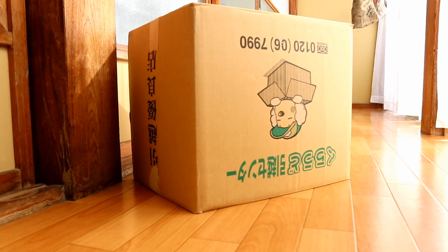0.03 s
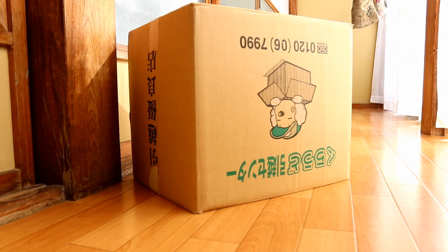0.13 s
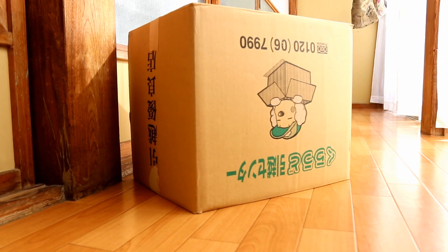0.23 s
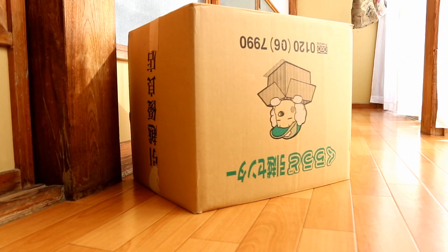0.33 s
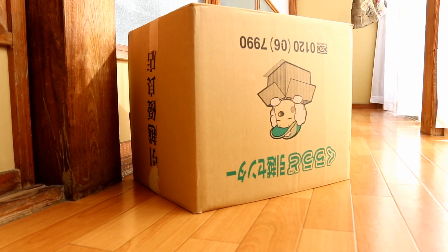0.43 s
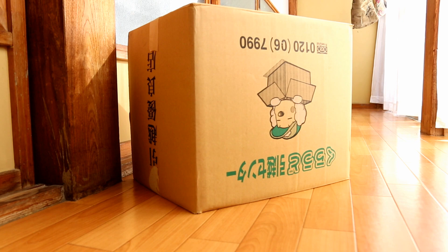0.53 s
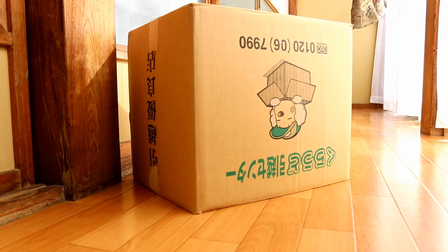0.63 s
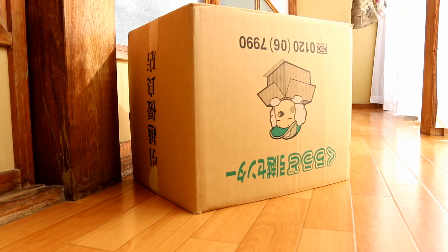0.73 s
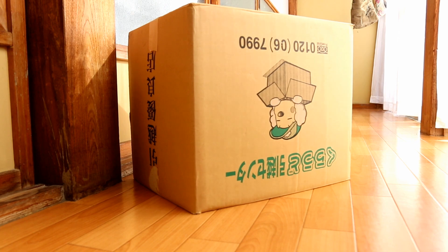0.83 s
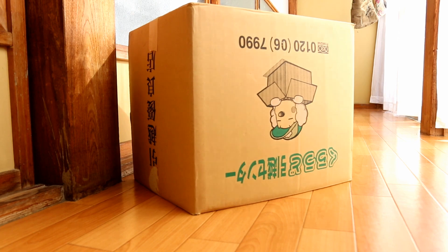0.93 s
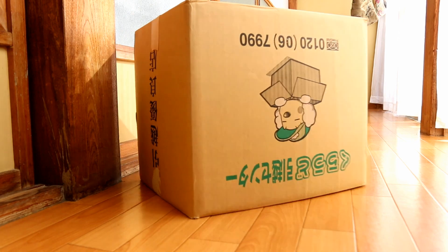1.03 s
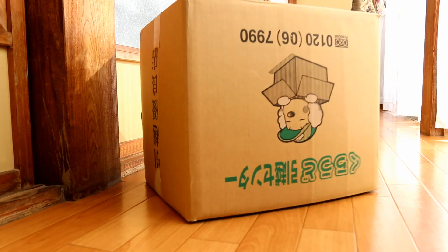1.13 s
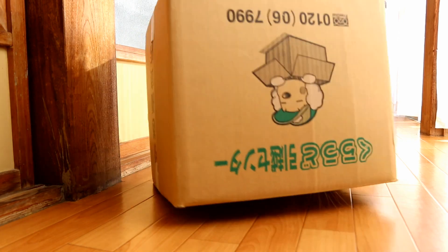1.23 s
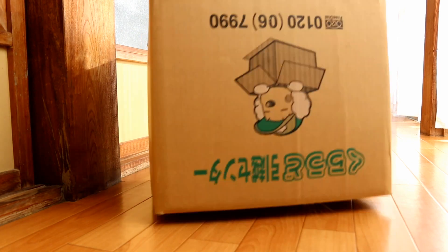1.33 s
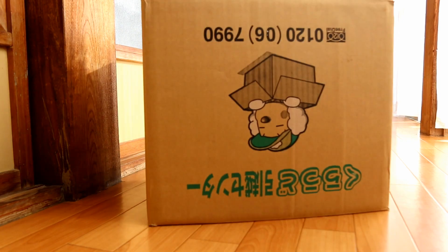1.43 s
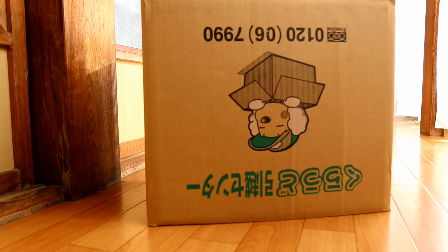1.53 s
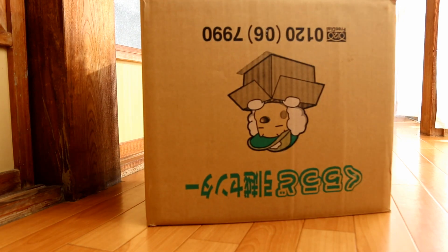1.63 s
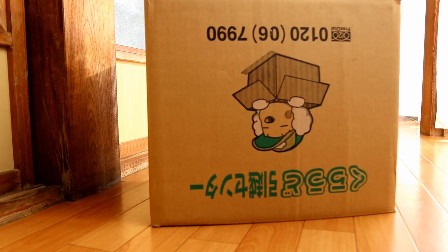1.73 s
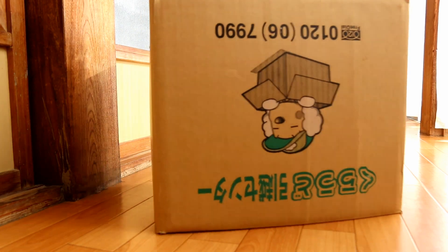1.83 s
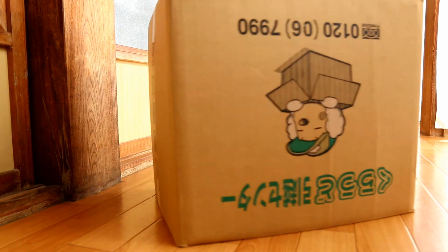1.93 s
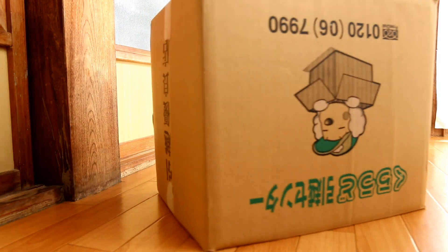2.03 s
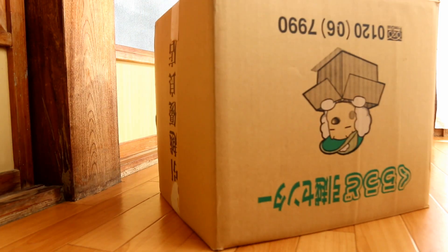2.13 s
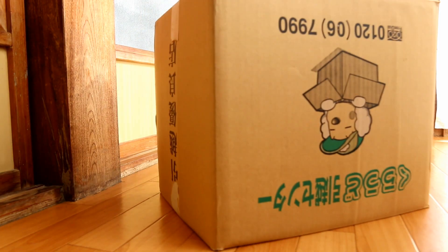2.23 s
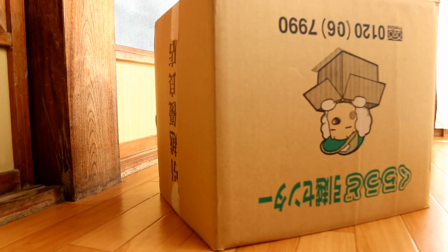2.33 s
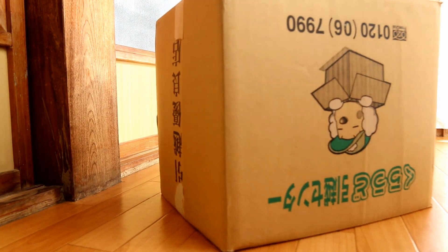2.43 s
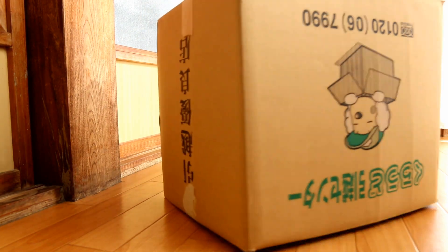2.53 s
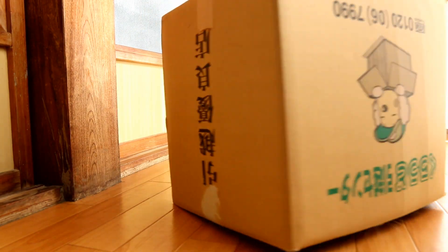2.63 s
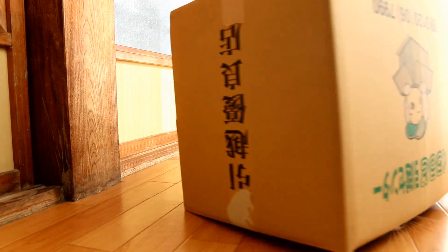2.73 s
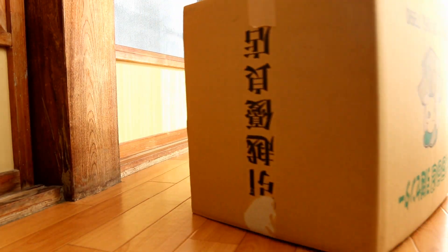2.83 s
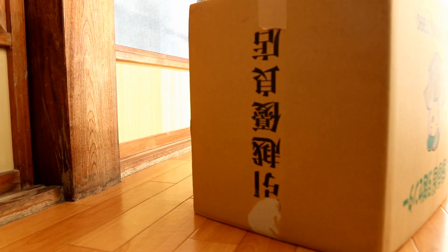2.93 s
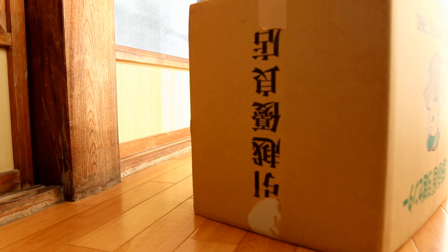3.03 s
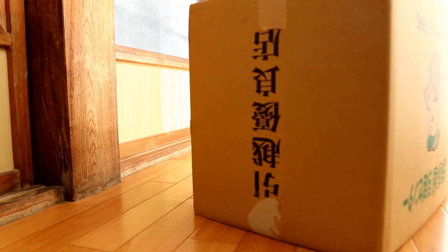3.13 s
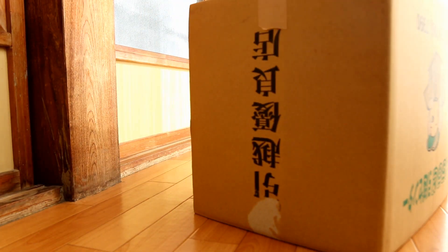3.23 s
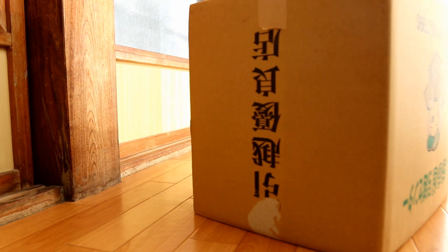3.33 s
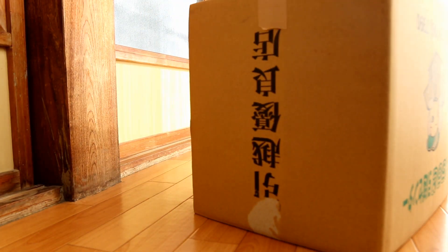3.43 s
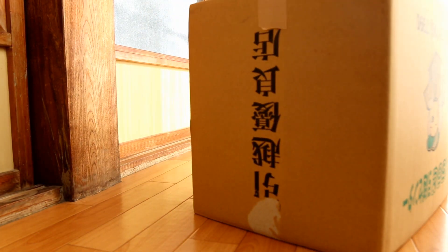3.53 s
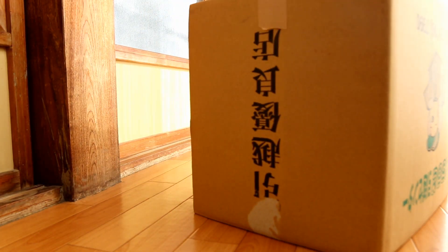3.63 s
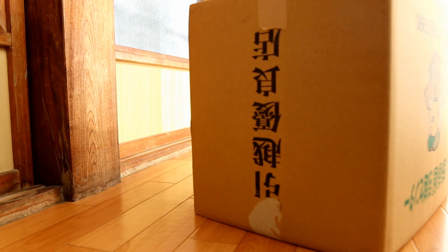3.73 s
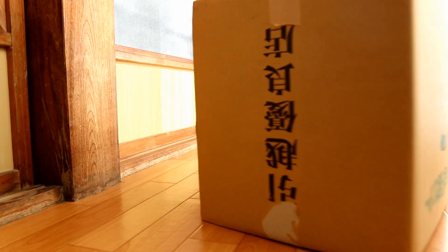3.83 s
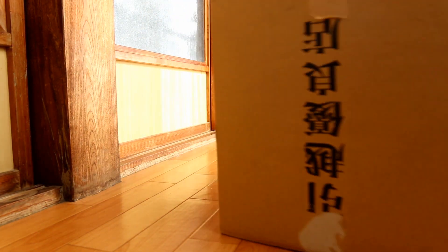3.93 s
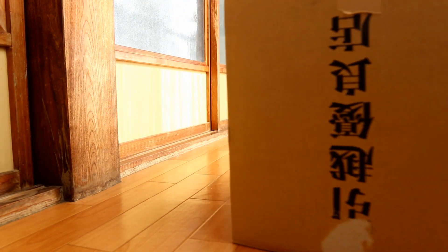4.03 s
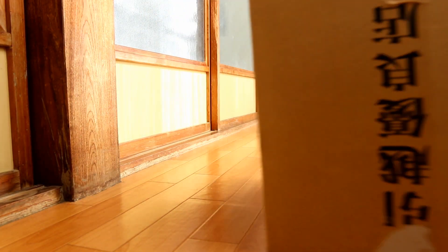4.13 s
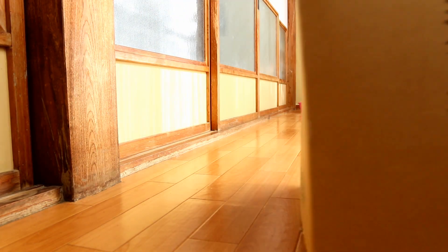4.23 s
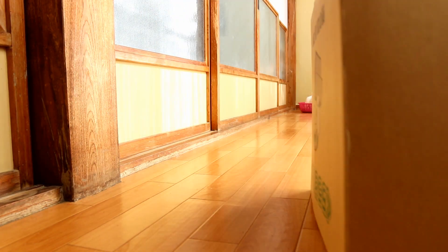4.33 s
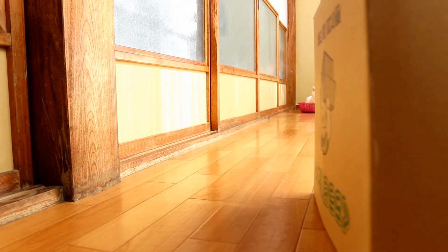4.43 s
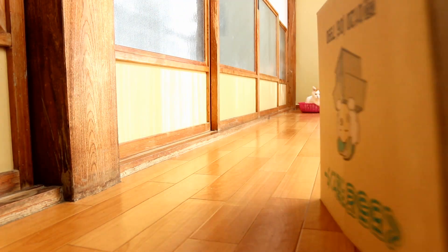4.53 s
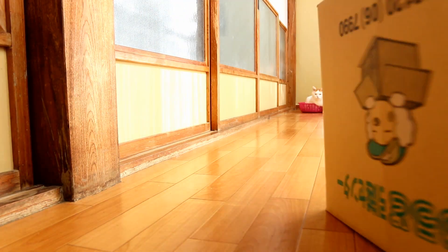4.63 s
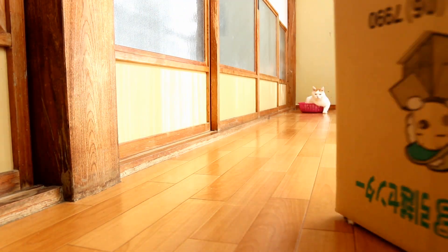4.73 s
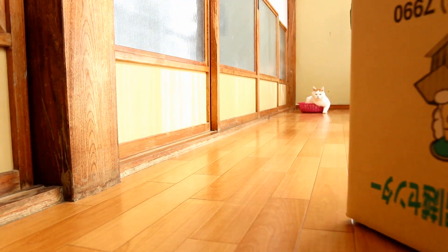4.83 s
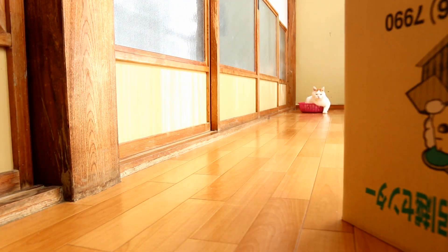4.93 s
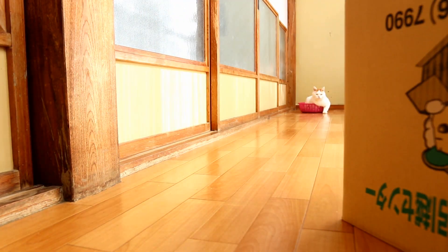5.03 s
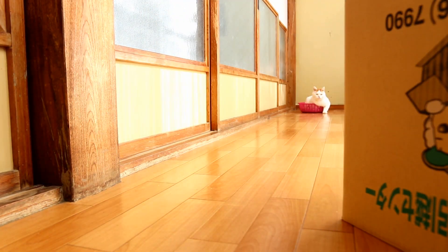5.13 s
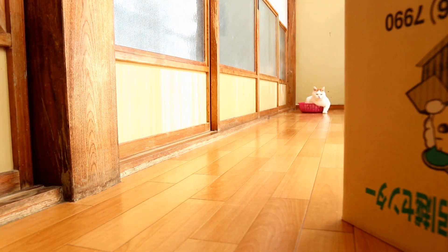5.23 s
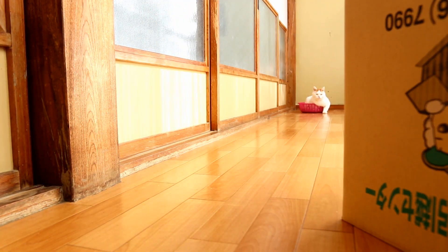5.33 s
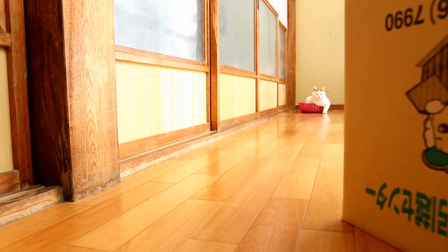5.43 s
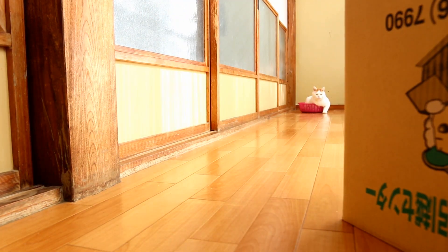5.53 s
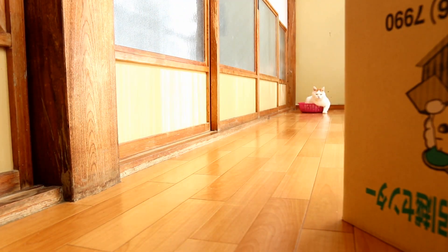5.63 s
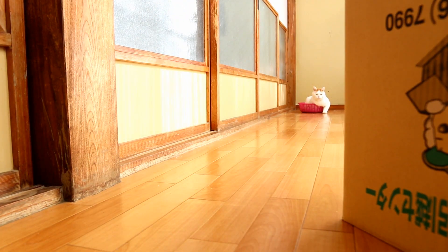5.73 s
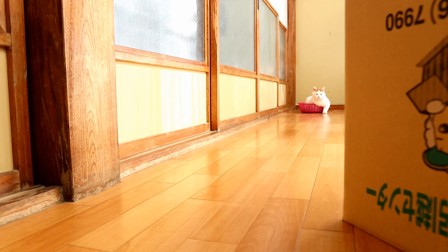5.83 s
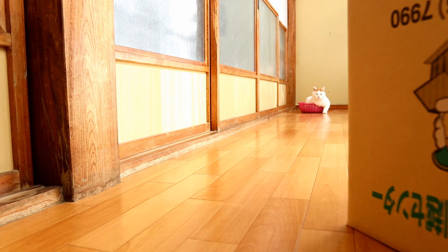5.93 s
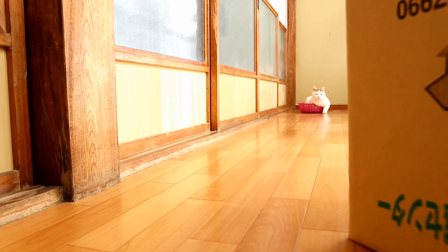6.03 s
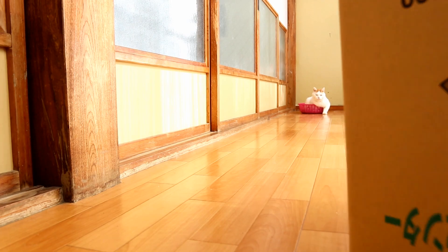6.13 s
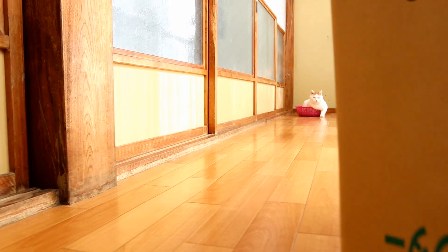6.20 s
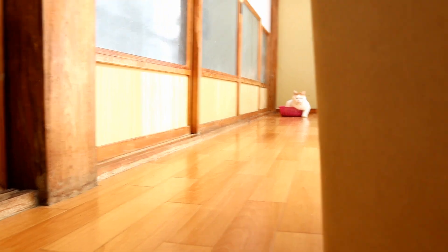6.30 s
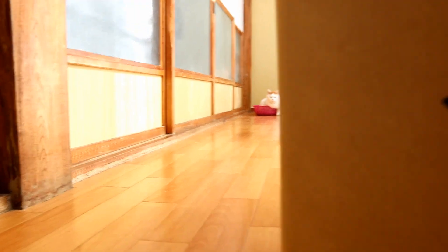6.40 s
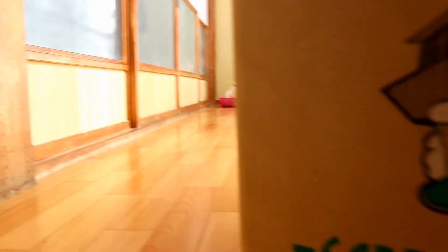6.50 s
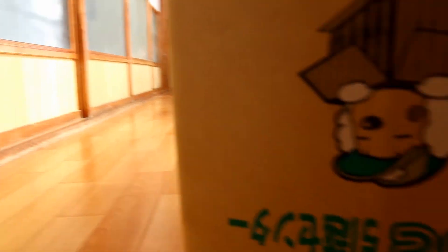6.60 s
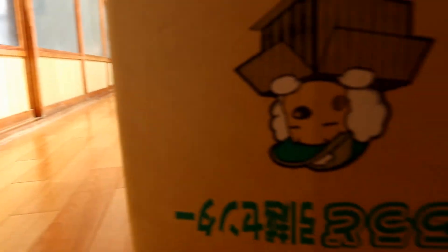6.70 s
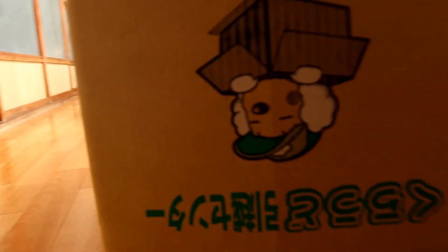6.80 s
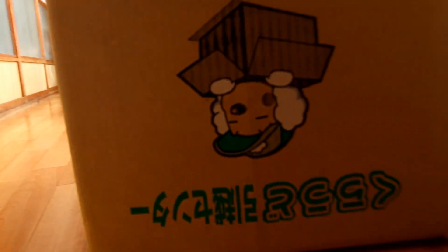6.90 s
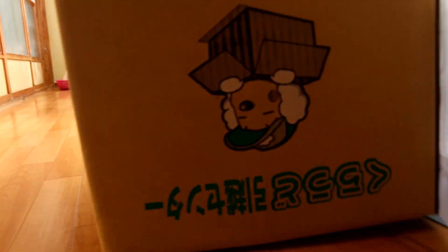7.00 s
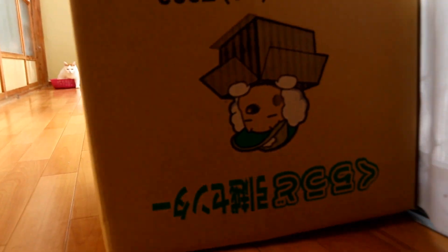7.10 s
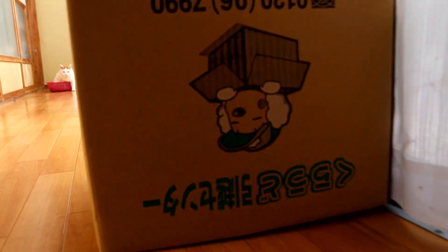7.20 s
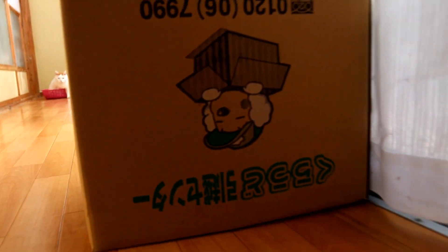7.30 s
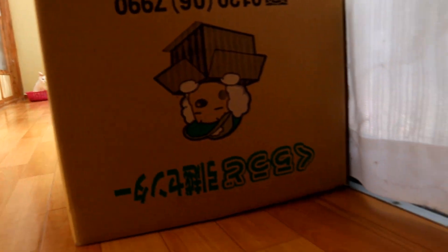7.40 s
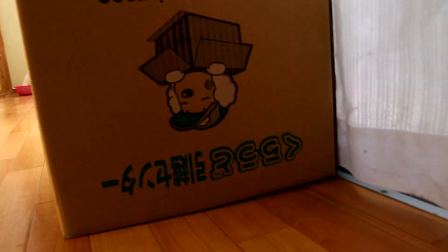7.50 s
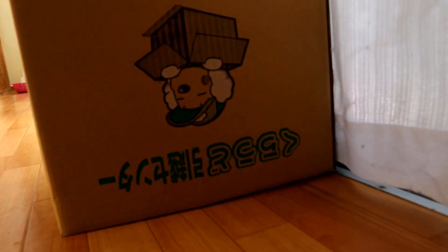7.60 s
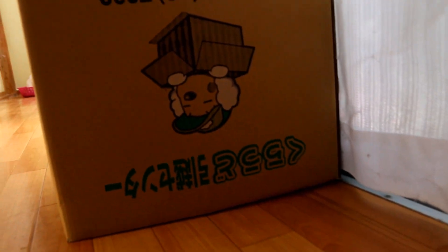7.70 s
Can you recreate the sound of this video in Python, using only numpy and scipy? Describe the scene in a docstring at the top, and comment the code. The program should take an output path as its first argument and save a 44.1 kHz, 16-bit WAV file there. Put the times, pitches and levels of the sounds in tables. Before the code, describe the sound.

Quiet indoor air, then light cardboard ticking and a tiny dropout in the sound. A hollow carton lands with deep, short, boomy thuds, scraped and turned between landings with gritty rasp and papery hiss. It rests briefly, then is shoved in a rapid run of bumps, pauses again, groans across the boards and thumps down again. Faint small-bell tinkles and edge squeaks; close stereo pickup, scraping slightly to the right, short room echo.

```python
"""Faint knocks and ticks, then heavy hollow thuds: an empty cardboard box is lifted, turned and shoved on boards.
Each landing excites the damped modes of the box; its flaps and edges tick as short bursts of filtered noise.
Sliding is stick-slip friction: random slips shake the same modes, while edges rasp and the paper face hisses.
A tiny bell tinkles, edges squeak, and a corridor answers over still air. The sound drops out once for an instant."""
import sys
import numpy as np
from scipy import signal
from scipy.fft import rfft, irfft
from scipy.io import wavfile
from scipy.ndimage import uniform_filter1d

SR = 44100
rng = np.random.default_rng(int(sys.argv[2]) if len(sys.argv) > 2 else 0)


def log_audio(samples):
    """Write samples as a 16-bit WAV file to the path given in sys.argv[1]."""
    # one column per channel
    frames = np.atleast_2d(samples).T
    # limit to full scale, then quantise
    limited = np.clip(frames, -1, 1)
    pcm = np.round(limited * 32767).astype(np.int16)
    wavfile.write(sys.argv[1], SR, pcm)


N = 342202  # samples

# Modes of the walls and air of the box.
# Each row: frequency in Hz, level in dB, t60 in seconds for a length factor of 1.
BOX_MODES = [(57.3, -37, 0.27), (80.9, -6.5, 0.58), (98.8, -4, 0.16), (122.7, -2, 0.23),
             (162.7, -0.5, 0.18), (197.7, -4, 0.36), (244.5, -7.5, 0.28), (287.5, -4, 0.22),
             (322.2, -10, 0.46), (382, -11, 0.45), (435.4, -1, 0.13), (474.8, -3, 0.2), (565.6, -7.5, 0.17),
             (608, -5.5, 0.19), (657, -22, 0.23), (875, -7.5, 0.041), (1134, -10, 0.062),
             (1470, -66, 0.015)]
# Coherence of the two channels. Each row: frequency in Hz, left-right likeness from -1 to 1.
COHERENCE = [(60, 1), (180, 0.95), (550, 0.78), (1650, -0.18), (4970, -0.074), (15000, -0.035)]


def gain_of(db):
    """Level in decibels is 20 times the logarithm of amplitude; this inverts it."""
    return 10 ** (np.asarray(db) / 20)


def evened(x):
    """Normalises the root-mean-square amplitude to 1."""
    return x / np.sqrt(np.mean(x ** 2) + 1e-20)


def read(points, hz):
    """Interpolates a spectrum over logarithmic frequency, as hearing spaces pitch."""
    f, value = np.transpose(points)
    return np.interp(np.log(hz + 1), np.log(f + 1), value)


def along(points, s):
    """Interpolates a curve linearly over time in seconds."""
    return np.interp(s, *np.transpose(points))


def add(mix, s, sound):
    """Superposition: sound pressures sum, here from time s onward."""
    part = mix[..., round(s * SR):][..., :sound.shape[-1]]
    part += sound[..., :part.shape[-1]]


def panned(pan_db):
    """Left and right gains for an interchannel level difference, positive to the left."""
    return gain_of(np.multiply.outer([.5, -.5], pan_db))


def correlated(left, other, hz):
    """Partial coherence: the right spectrum shares part of the left and fills up with independent noise."""
    same = np.clip(read(COHERENCE, hz), -1, 1)[:, None]
    return same * left + np.sqrt(1 - same ** 2) * other


def noise(colour, patchy_db, flicker_db, size=512, bins=8, frames_long=16):
    """Gaussian noise shaped in time-frequency cells, with drifting patches and a flicker shared by all bands."""
    frames, hz = 4 * N // size + 5, np.fft.rfftfreq(size, 1 / SR)
    a, b, c, d, patches = rng.standard_normal((frames, len(hz), 5)).T
    flicker = evened(uniform_filter1d(patches[0], 4))
    patches = uniform_filter1d(patches, bins, 0)
    patches = evened(uniform_filter1d(patches, frames_long, 1))
    left = a + 1j * b
    cells = np.array([left, correlated(left, c + 1j * d, hz)])
    cells *= gain_of(read(colour, hz)[:, None] + patchy_db * patches + flicker_db * flicker)
    sound = signal.istft(cells, nperseg=size, noverlap=size - size // 4)[1]
    return evened(sound[:, :N])


def still_air():
    """Stationary broadband noise: the quiet background at a constant mean level."""
    # Spectral density of the background. Each row: frequency in Hz, relative density in dB per Hz.
    air_colour = [(15, -44), (25, -11), (82, 12.5), (242, -14.5), (335, 2), (373, -18.5), (607, -11),
                  (714, -7.5), (962, -18), (1230, -10), (1740, -16), (8830, -30), (16000, -46)]
    return gain_of(-50) * noise(air_colour, patchy_db=0.5, flicker_db=-0.9, size=2048)


def corridor(x):
    """Reverberation: sparse reflections of random sign, each band decaying exponentially at its own rate."""
    # Decay of the corridor. Each row: frequency in Hz, t60 in seconds.
    hall_t60 = [(100, 0.49), (400, 0.3), (1500, 0.16), (8000, 0.15)]
    taps = np.zeros((2, SR // 2))
    start = np.arange(200, SR // 2 - 20, 20)  # one tap in every 20 samples
    at = start + rng.integers(0, 20, (2, len(start)))
    signs = rng.choice([-1., 1.], at.shape)
    np.put_along_axis(taps, at, signs, 1)
    hz, t, cells = signal.stft(taps, SR, nperseg=256)
    cells[1] = correlated(cells[0], cells[1], hz)  # long waves reach both ports alike
    decay = gain_of(-60 * t / read(hall_t60, hz)[:, None])
    tail = signal.istft(cells * decay, SR, nperseg=256)[1]
    return signal.fftconvolve(x[None], tail / np.linalg.norm(tail[0]), axes=1)[:, :N]


def bell():
    """Modal decay: three thin modes of a pea-sized bell, amplitude-modulated as it swings."""
    # Shakes of the bell. Each row: start in seconds, level in dB, then dB of each of three modes against it.
    tinkle_table = [(4.2986, -26, -38, -19, -7), (5.7124, -47, 7, -10, -11), (6.4842, -25.5, 3, -8, -8),
                    (6.5465, -36.5, -6, -2, -17), (6.6628, -41, -1, -5, -18), (7.285, -37.5, 0, -6, -12)]
    # Modes of the bell. Each row: frequency in Hz, t60 in seconds.
    bell_modes = [(3628, .075), (8855, .13), (9522, .17)]
    out, t = np.zeros(N), np.arange(SR // 3) / SR
    strike = 0.32 + np.exp(-t / 0.012)  # a bright onset above the lingering tone
    for (s, db, *modes_db), phase in zip(tinkle_table, rng.random(len(tinkle_table))):
        swing = 1 + 0.089 * np.sin(2 * np.pi * (45 * t + phase))
        for (hz, t60), mode_db in zip(bell_modes, modes_db):
            fade = gain_of(db + mode_db - 60 * t / t60)
            add(out, s, swing * fade * strike * np.sin(2 * np.pi * hz * t))
    return out * gain_of([[-3], [1.5]])


def squeaks():
    """Stick-slip at an audible rate: fast uneven slips of an edge on varnish make a fuzzy tone."""
    # Squeaks. Each row: start in seconds, peak in dB before panning, mean pitch in Hz, length in seconds.
    squeak_table = [(4.769, -33, 1248, 0.026), (5.02, -34.5, 2120, 0.024), (6.331, -41, 2110, 0.072),
                    (6.38, -44, 1770, 0.054), (6.812, -49, 1220, 0.037), (6.834, -39, 2463, 0.054)]
    out = np.zeros(N)
    for (s, db, hz, length), draw in zip(squeak_table, rng.standard_normal((len(squeak_table), 4096))):
        n = int(length * SR)
        wander = evened(uniform_filter1d(draw, 150))[:n]
        cycles = np.cumsum(hz * (1 + 0.041 * wander)) / SR
        add(out, s, gain_of(db) * np.hanning(n) * np.sin(2 * np.pi * cycles))
    return out * gain_of([[-3], [1.5]])


def ticks():
    """Impulsive fracture noise: a short burst of crushed fibre, with a stiff flap ringing."""
    # Ticks of flaps and edges. Each row: start in seconds, peak in dB before panning,
    # t60 of the rustle in seconds, treble tilt in dB per octave.
    tick_table = [(0.4362, -35, 0.17, -3), (0.4848, -38.5, 0.06, -5), (0.5462, -40, 0.062, -3),
                  (0.604, -34, 0.044, -6.5), (0.6789, -39, .05, -5), (0.7415, -27, 0.11, -.6),
                  (0.7622, -26.5, 0.24, -5.5), (0.8192, -18.5, 0.051, -5), (0.868, -19, 0.036, -7),
                  (0.9306, -25, 0.035, -0.5), (1.05, -17, 0.031, -3.5), (1.067, -28, .03, -3),
                  (1.3013, -22.5, 0.051, -7.5), (1.5686, -6, 0.03, -5.5), (1.706, -27.5, 0.097, -17),
                  (1.7838, -19.5, 0.19, -9), (1.825, -21.5, 0.043, -12), (2.2472, -19.5, 0.16, -5.5),
                  (2.296, -24, 0.024, -4), (2.3037, -23, 0.18, -7.5), (2.4933, -30.5, 0.058, -9),
                  (2.5579, -22.5, 0.21, 0), (3.0345, -24, 0.073, -1), (3.0588, -27.5, 0.049, -1),
                  (3.2962, -39, 0.078, -6), (3.4117, -37, 0.29, -14), (3.5079, -34.5, 0.065, -3),
                  (3.895, -21, 0.052, 1), (4.36, -25, 0.043, -1), (4.3971, -24.5, 0.061, 1),
                  (4.5226, -14.5, 0.028, 0.5), (4.9427, -14.5, 0.16, -1.5), (5.053, -26, 0.071, 1.5),
                  (5.326, -38, .054, -4), (5.675, -25, 0.04, 0), (5.712, -25, 0.15, -22),
                  (5.9798, -26, 0.21, -5), (6.0524, -17, 0.3, -6), (6.092, -19.5, 0.12, -6),
                  (6.1136, -32, .08, -5), (6.141, -25, 0.1, -9), (6.18, -23, 0.076, -6),
                  (6.577, -19.5, 0.012, 2.5), (6.6734, -24.5, 0.045, -12), (6.7048, -25.5, 0.09, -6.5),
                  (6.8875, -17, 0.038, -4), (7.219, -22.5, 0.2, -5), (7.2833, -22.5, 0.046, -16),
                  (7.6196, -29.5, 0.067, -7)]
    # Spectrum of the burst before its tilt. Each row: frequency in Hz, level in dB.
    tick_colour = [(500, 2), (1200, 2.5), (3500, -5), (5000, -14), (9000, -4), (15000, -24.5)]
    # Modes of a stiff flap. Each row: mean frequency in Hz, level in dB.
    flap_modes = [(1130, -3), (1720, -12.5)]
    # Where ticks are heard. Each row: time in seconds, left minus right in dB.
    edge_place = [(0, -4), (.85, -3.5), (1.5, -5.5), (2.4, 0.5), (3.0, -14.5), (3.45, 0.5), (4.5, -12),
                  (6.0, -8.5), (6.15, -16.5), (6.9, -17), (7.2, 1), (7.76, -11)]
    out, t = np.zeros((2, N)), np.arange(4096) / SR
    hz = np.fft.rfftfreq(len(t), 1 / SR)
    draws = rng.standard_normal((len(tick_table), 2, len(t)))
    for (s, db, t60, tilt_db), draw in zip(tick_table, draws):
        colour = gain_of(read(tick_colour, hz) + tilt_db * np.log2(1 + hz / 1500))
        fibre = evened(irfft(rfft(draw + 0.32 * draw[::-1]) * colour))
        detune = 1 + 0.076 * draw[0, 0]
        flap = sum(gain_of(mode_db) * np.sin(2 * np.pi * mode_hz * detune * t) for mode_hz, mode_db in flap_modes)
        burst = fibre + flap * gain_of(-60 * t / 0.042)
        snap = np.exp(-(t / 0.0028) ** 2) + 1.1 * gain_of(-60 * t / t60)  # sharp break, then rustle
        burst *= snap * (1 - np.exp(-t / 0.00026))
        pan = panned(along(edge_place, s))[:, None]
        add(out, s, gain_of(db) * pan * burst / abs(burst.mean(0)).max())
    return out


def shoves():
    """Friction noise grows as a power of sliding speed; overlapping shoves add in power."""
    # Shoves that speed up and slow to a stop. Each row: start, speeding-up time and slowing time in seconds,
    # then the gains at top speed in dB for rumble of the bottom, rasp of the edges, hiss of the paper face.
    shove_table = [(0.74, 0.18, 0.23, -58, -44.5, -53.5), (1.04, 0.039, 0.73, -39.5, -39, -46.5),
                   (1.27, 0.085, 0.1, -30.5, -37, -43), (1.44, 0.083, 0.056, -28, -45, -41),
                   (1.59, 0.11, 0.14, -28.5, -48.5, -66), (1.76, 0.043, 0.18, -29.5, -40, -46),
                   (1.89, 0.11, 0.19, -39, -44.5, -49), (2.0, 0.1, 0.13, -38.5, -36, -38.5),
                   (2.19, 0.054, 0.085, -55, -42, -48.5), (2.46, 0.08, 0.12, -44, -46.5, -52.5),
                   (2.6, 0.12, 0.062, -45, -42, -47), (2.72, 0.15, .16, -37, -40.5, -37),
                   (3.15, .15, .35, -51, -70, -56), (3.869, 0.053, 0.17, -35.5, -38.5, -44),
                   (4.0, 0.12, 0.11, -27.5, -37.5, -42.5), (4.16, 0.16, 0.19, -34, -40.5, -40.5),
                   (4.41, 0.066, 0.09, -24, -40.5, -48), (4.53, 0.084, 0.071, -23, -63, -53),
                   (4.58, .11, 0.084, -30.5, -42, -40.5), (4.701, 0.092, .08, -40, -39, -38.5),
                   (4.82, 0.076, 0.084, -37, -35, -37), (4.961, 0.075, 0.064, -21, -31.5, -44),
                   (5.06, 0.045, 0.12, -24, -52, -68), (5.15, 0.038, 0.038, -47, -51.5, -52),
                   (5.4, 0.066, 0.16, -59, -50.5, -52), (5.65, 0.032, 0.12, -56, -37.5, -50),
                   (5.78, 0.096, 0.15, -52, -48.5, -43), (5.95, 0.092, 0.1, -42, -41.5, -44.5),
                   (6.04, .12, 0.65, -34, -35.5, -40.5), (6.26, 0.27, .16, -25, -48, -38),
                   (6.57, 0.098, 0.36, -25.5, -42.5, -52), (6.751, 0.13, 0.057, -38, -37, -42),
                   (6.92, 0.048, 0.45, -35, -40, -45.5), (7.08, 0.081, 0.24, -35, -36.5, -37),
                   (7.24, 0.2, 0.16, -36, -37.5, -39.5), (7.5, .08, .4, -53, -48.5, -49.5)]
    # Exponents of speed for the amplitudes of rumble, rasp and hiss.
    speed_power = [2.3, 0.96, 1.04]
    # Gains of rumble, rasp and hiss in dB while the box only shifts in the hands.
    rest_db = [-55, -54, -59]
    # A hiss dying away at the start: its first gain in dB, the seconds in which it falls by 9 dB.
    fading_hiss = (-47, 0.087)
    power = gain_of(rest_db)[:, None] ** 2 * np.ones(N)
    fading_db, fading_s = fading_hiss
    power[2] += (gain_of(fading_db) * np.exp(-np.arange(N) / SR / fading_s)) ** 2
    for s, rise, fall, *top_db in shove_table:
        t = np.arange(0, rise + fall, 1 / SR)
        ramp = np.minimum(t / rise, (rise + fall - t) / fall)
        speed = np.sin(np.pi / 2 * np.clip(ramp, 0, 1))
        gain = gain_of(top_db)[:, None] * speed ** np.array(speed_power)[:, None]
        add(power, s, gain ** 2)
    return np.sqrt(power)


def grit(depth_db):
    """Shot noise: caught dust and fibres make the gain jump at each grain and fall within milliseconds."""
    caught = rng.random(N) < 300 / SR  # grains per second
    grains = gain_of(4.03 * np.minimum(rng.exponential(1, N), 5)) * caught
    fall = gain_of(-60 * np.arange(800) / SR / 0.0097)
    return 1 + gain_of(depth_db) * evened(signal.oaconvolve(grains, fall)[:N])


def rasp():
    """Rough-surface friction: coloured noise of the edges, roughened by grit."""
    # Spectral density of the rasp. Each row: frequency in Hz, relative density in dB per Hz.
    rasp_colour = [(120, -23), (200, 7.5), (262, -12.5), (320, 2), (392, -8), (486, -3.5), (719, -12.5),
                   (1230, -8), (1590, -10), (1770, -11), (2960, -15.5), (5000, -26.5), (6500, -20.5),
                   (11000, -120)]
    return grit(depth_db=-15) * noise(rasp_colour, patchy_db=3.5, flicker_db=1.5, bins=3, frames_long=14)


def hiss(t):
    """Fine-asperity friction: the paper face hisses; a thin, patchy treble layer above 8 kHz rises and falls over it."""
    # Spectral densities of the paper hiss and of the top treble.
    # Each row: frequency in Hz, relative density in dB per Hz.
    hiss_colour = [(1470, -16), (2500, -6), (3600, -5), (5120, -13.5), (7040, -2.5), (9270, -2.5),
                   (9870, -2.5), (13000, -17.5)]
    treble_colour = [(8000, -36), (11500, 1.5), (13000, -4.5), (16000, -8)]
    # Level of the patchy top treble. Each row: time in seconds, level against the paper hiss in dB.
    treble_level = [(0, -9), (1.0, -7.5), (1.5, -17), (2.2, -23), (2.5, -17), (2.9, -8), (3.6, -4),
                    (4.2, -24), (4.65, -19), (4.78, -2), (4.9, -27), (5.1, -19), (5.4, -8), (6.4, -11.5),
                    (6.7, -19), (7.2, -4.5), (7.76, -9.5)]
    paper = noise(hiss_colour, patchy_db=1.2, flicker_db=0.4, size=256)
    treble = noise(treble_colour, patchy_db=3.0, flicker_db=1.0, size=256)
    return (paper + gain_of(along(treble_level, t)) * treble) * grit(depth_db=-21.5)


def judder(t):
    """Stick-slip envelope: a wall starts to judder on the boards and comes to rest."""
    # The groan: length in seconds, gain in dB, centre pitch in Hz, slips per second.
    groan = (0.105, -25, 459, 1100)
    start_s = 6.05
    length, db, hz, per_s = groan
    envelope = np.sqrt(np.clip(1 - (t - start_s) / length, 0, 1))
    return shaken(gain_of(db) * (t > start_s) * envelope, per_s, hz, slope_db=5)


def slide():
    """Friction feeds two paths: slips ring the box modes, while surface noise radiates directly."""
    # Where the sliding is heard. Each row: time in seconds, left minus right in dB.
    slide_place = [(0, 0.5), (1.0, -1.5), (2.4, -2.5), (2.95, -4), (3.4, -0.5), (4.5, -4.5), (5.8, -4),
                   (6.6, -4), (7.0, -3.5), (7.76, -0.5)]
    t = np.arange(N) / SR
    rumble_gain, rasp_gain, hiss_gain = shoves()
    rumble = shaken(rumble_gain, per_s=260, hz=122, slope_db=-8.5) + judder(t)
    friction = rasp_gain * rasp() + hiss_gain * hiss(t)
    return rumble, friction * panned(along(slide_place, t))


def shaken(gain, per_s, hz, slope_db):
    """Linear response: random slips convolved with the impulse response of the box modes around hz."""
    size = gain_of(3.76 * np.minimum(rng.exponential(1, N), 5))
    slips = size * (rng.random(N) < per_s / SR) * rng.choice([-1, 1], N)
    body = ring(hz, slope_db, 0.4, np.zeros((len(BOX_MODES), 5)), below_db=-19.5)[0]
    return signal.oaconvolve(evened(slips) * gain, body / np.linalg.norm(body))[:N]


def ring(centre_hz, above_db, length, chance, below_db=-11.5):
    """Modal superposition: modes near the struck wall's pitch sound most; slopes in dB per octave."""
    hz, db, t60 = np.transpose(BOX_MODES)[:, :, None]
    level_draw, tune_draw, phase_draw, side_phase, side_level = chance.T[:, :, None]
    octaves = np.log2(hz / centre_hz)
    t = np.maximum(np.arange(SR // 2) / SR - 0.48 / hz, 0)  # bending waves: the low modes arrive last
    db = db + np.where(octaves > 0, above_db * octaves, -below_db * octaves)
    db += 5 * np.exp(-(octaves / 0.22) ** 2) + 3.07 * level_draw
    # the loose walls give up most of their swing quickly, the rest lingers
    fade = 1.09 * gain_of(-60 * t / (0.33 * t60 * length)) + 0.23 * gain_of(-60 * t / (t60 * length))
    fade *= 1 - np.exp(-t * hz / 0.35)  # a wall needs part of a cycle to swing up
    # higher modes radiate more unevenly to left and right
    uneven = np.array([-1, 1])[:, None, None] * np.minimum(hz / 600, 1)
    phase = 1.2 * phase_draw + 0.34 * uneven * side_phase
    db = db + 2.4 * uneven * side_level
    wave = np.sin(2 * np.pi * hz * (1 + 0.019 * tune_draw) * t + phase)
    sound = (gain_of(db) * fade * wave).sum(1)
    return sound / abs(sound).max()


def thuds():
    """Impact excitation: each landing or knock sets the box modes ringing freely."""
    # Blows on the box. Each row: start in seconds, peak in dB, pitch in Hz of the walls hit hardest,
    # slope in dB per octave above that pitch, ring length factor (held within 0.1 to 3).
    thud_table = [(0.42, -34, 280, -13, 1.6), (0.49, -33, 100, -18, .8), (0.735, -28, 73, -5, 1.05),
                  (0.925, -24.5, 106, 0, 1.7), (1.048, -30, 437, -9, 2.8), (1.283, -17, 112, -20, .85),
                  (1.321, -13.5, 112, -8, 1), (1.568, -1.5, 139, -6.5, 1.46), (1.779, -19, 79.2, 11, 0.73),
                  (1.971, -26.5, 116, -9.5, 1.9), (2.242, -3.5, 118, -5, 0.77), (2.298, -22, 208, -8, .45),
                  (2.555, -25.5, 110, 3, 0.7), (2.637, -24.5, 80.5, -16, 0.52), (2.829, -25, 113, -16, 2.6),
                  (2.961, -17.5, 506, -9, 0.76), (3.034, 0, 103, -7.5, 0.84), (3.447, -38, 86.5, -25, 0.65),
                  (3.537, -36, 80.7, -14, 0.53), (3.889, -18, 95.6, -8.5, 0.65),
                  (3.963, -21.5, 478, -12, 0.63), (4.1, -20, 118, -17, 3.6), (4.358, -13, 78.5, -4, 1.3),
                  (4.394, -4, 116, -7, 1.4), (4.504, -10.5, 119, -15.5, 0.59), (4.522, 1.5, 113, -3, 0.41),
                  (4.783, -11.5, 115, -8, 1.15), (4.904, -6.5, 86.5, -8.5, 0.54),
                  (4.941, -4, 178, -5, 1.12), (5.049, -0.5, 116, -5, 0.87), (5.672, -18.5, 91.5, -8, 1.1),
                  (5.851, -16.5, 570, 2.5, 1.6), (5.981, -27, 326, -22, 1.1), (6.053, -10, 480, -5, 2.9),
                  (6.086, -10.5, 485, -7, 2), (6.183, -14.5, 500, -15, 1.8), (6.194, -14, 105, -16, 1.2),
                  (6.421, -26, 72.7, -28, 1.5), (6.575, 0, 121, -5, 0.94), (6.656, -7.5, 196, -4, .42),
                  (6.885, -1, 157, -0.5, 0.7), (7.154, -15.5, 132, -14, 0.67), (7.264, -19.5, 196, -9, 2),
                  (7.441, -14, 99, -10.5, 0.92)]
    out, chance = np.zeros((2, N)), rng.standard_normal((len(thud_table), len(BOX_MODES), 5))
    for (s, db, hz, above_db, length), draw in zip(thud_table, chance):
        blow = ring(hz, above_db, np.clip(length, .1, 3), draw)
        add(out, s + 0.0011, gain_of(db) * blow)
    return out


def scene():
    """Direct sound and reverberation of box and bell superpose over still air."""
    rumble, friction = slide()
    low = thuds() + rumble
    sharp = ticks() + bell() + squeaks()
    low = np.array([np.roll(low[0], 5), low[1]])  # the left lags by 5 samples: the box stands to the right
    wet = gain_of(-11) * corridor(low.mean(0)) + gain_of(-7.0) * corridor(sharp.mean(0))
    return low + sharp + friction + wet + still_air()


def record(dry):
    """A band-limited channel with overload: bass cut, a brief dropout, clipping at full scale, treble cut."""
    # The dropout: start in seconds, end in seconds, gain in dB.
    dropout = (.894, .913, -19)
    edge_hz = 16000
    from_s, to_s, drop_db = dropout
    t = np.arange(N) / SR
    mute_db = uniform_filter1d(((t > from_s) & (t < to_s)) * drop_db * 1., 60)
    thinned = signal.sosfilt(signal.butter(4, 44, "high", fs=SR, output="sos"), dry)
    clipped = np.clip(thinned * gain_of(mute_db), -1, 1)
    lowpass = signal.firwin(511, edge_hz, window=("kaiser", 9), fs=SR)
    return signal.oaconvolve(clipped, lowpass[None], "same")


dry = scene()
out = record(dry)
log_audio(out)
```